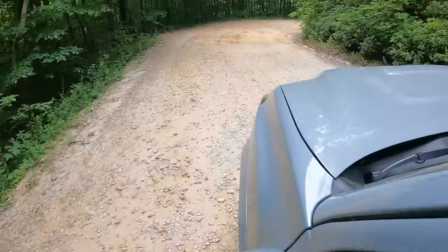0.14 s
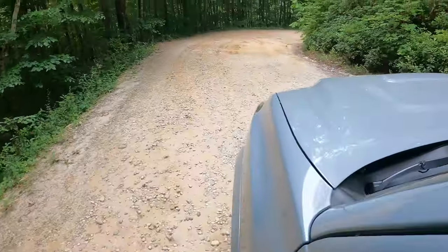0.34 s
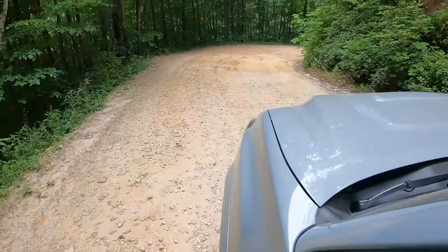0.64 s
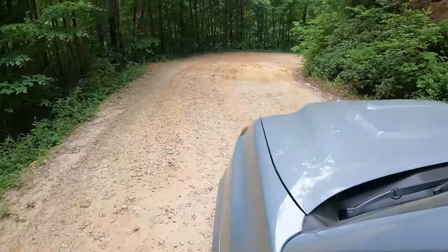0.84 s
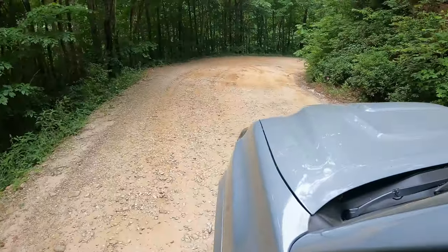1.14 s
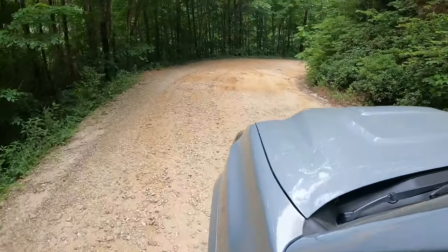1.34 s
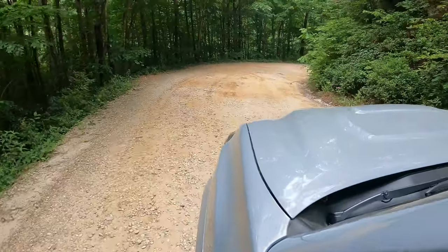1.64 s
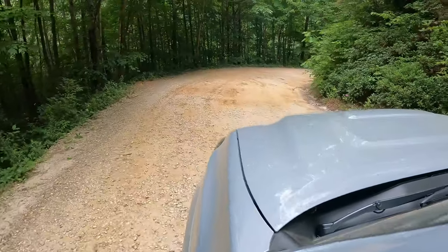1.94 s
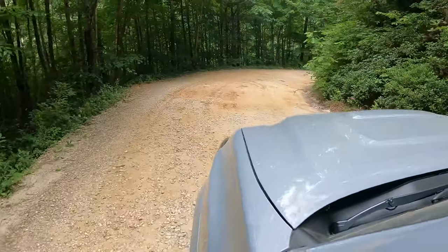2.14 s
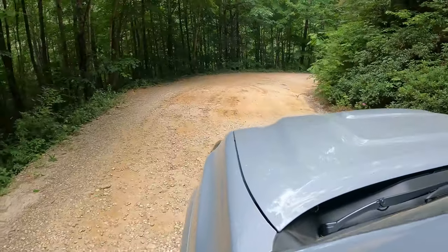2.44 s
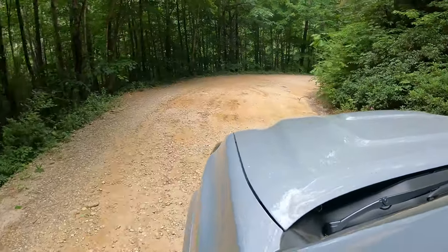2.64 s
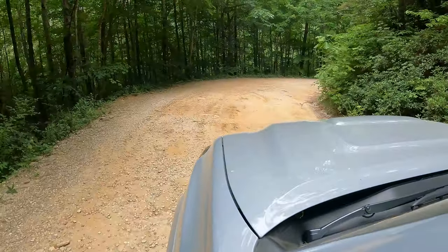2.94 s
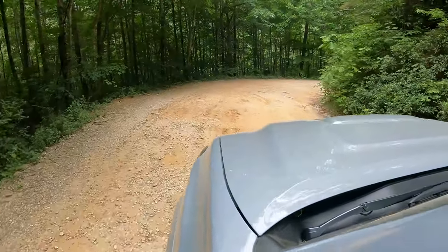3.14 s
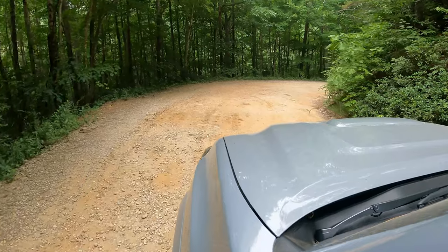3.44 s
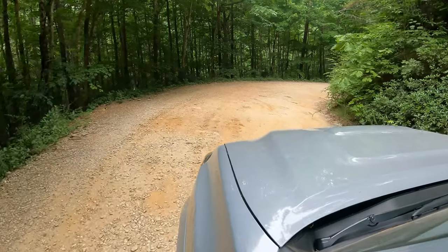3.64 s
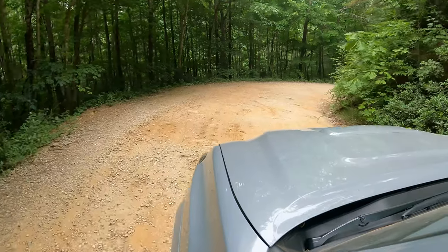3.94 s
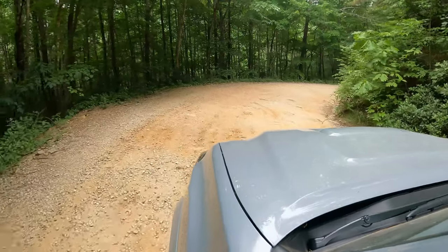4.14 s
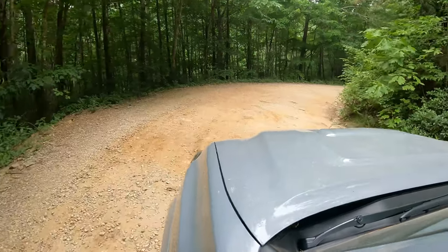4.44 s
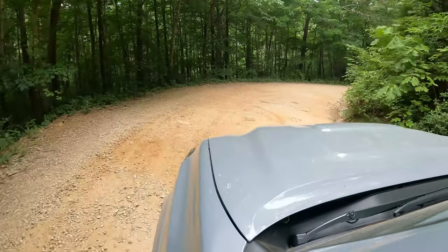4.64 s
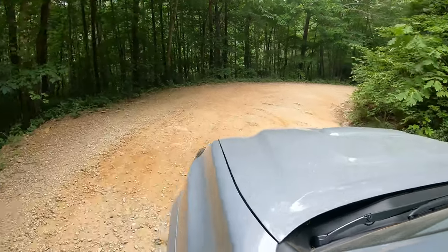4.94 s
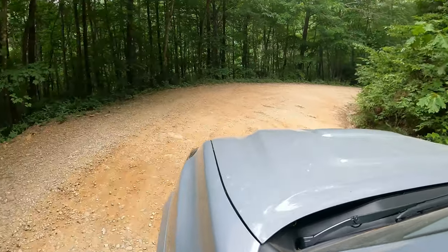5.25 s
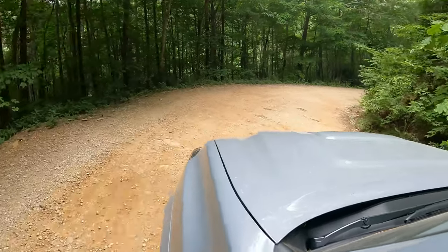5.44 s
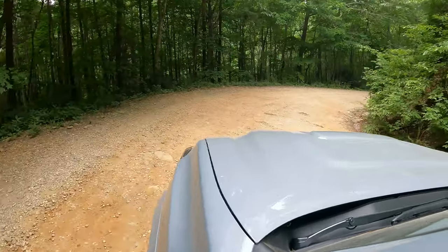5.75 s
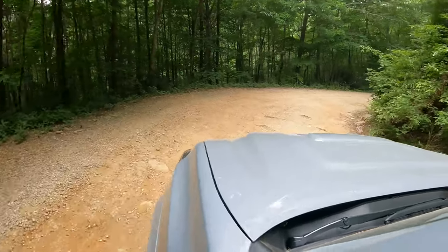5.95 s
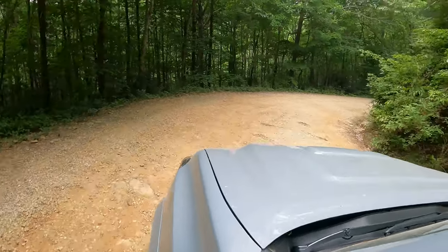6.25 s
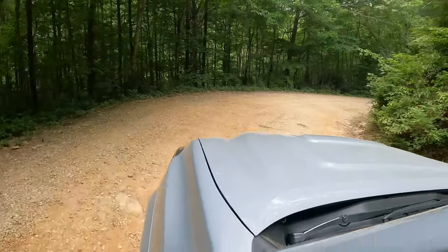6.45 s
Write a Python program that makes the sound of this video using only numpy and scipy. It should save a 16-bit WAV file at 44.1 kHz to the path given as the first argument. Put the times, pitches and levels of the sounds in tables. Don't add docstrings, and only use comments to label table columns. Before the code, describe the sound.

Slow tyres crush loose gravel with hollow, irregular pops and snaps, thickening into busy bursts, above a soft low engine drone and chassis rumble.

```python
import sys
import numpy as np
from scipy import signal
from scipy.io import wavfile

SR = 44100
rng = np.random.default_rng(int(sys.argv[2]) if len(sys.argv) > 2 else 0)


def to_wav(sig):
    pcm = np.clip(np.atleast_2d(sig), -1, 1) * 32767
    pcm = np.round(pcm).astype(np.int16)
    wavfile.write(sys.argv[1], SR, pcm.T)


def attenuation_scalar(level_db):
    decades = np.asarray(level_db, float) / 20
    return 10 ** decades


N = 291501


def evened(x):
    return x / np.sqrt(np.mean(x ** 2) + 1e-20)


def curve(rows, order=1):
    rows = np.array(rows, float)
    return np.interp(np.arange(N) / SR, rows[:, 0], rows[:, order])


def colour(x, points, size=8192):
    f, db = np.transpose(points)
    hz = abs(np.fft.fftfreq(size, 1 / SR))
    log_gain = np.log(attenuation_scalar(np.interp(np.log(hz + 1), np.log(f + 1), db)))
    response = np.exp(np.conj(signal.hilbert(log_gain)))
    taps = np.fft.ifft(response).real[:size // 2] * np.hanning(size)[size // 2:]
    return signal.oaconvolve(np.atleast_2d(x), taps[None], axes=1)[:, :x.shape[-1]]


def drift(hz):
    low = signal.butter(2, hz, fs=SR, output="sos")
    return evened(signal.sosfilt(low, rng.standard_normal(N)))


def add(mix, start_s, sound, pan_db):
    part = mix[:, round(start_s * SR):][:, :len(sound)]
    difference = np.tanh(np.clip(pan_db, -1, 7) * np.log(10) / 40)
    part += np.outer([1, difference], sound[:part.shape[1]])


def lean(snap_s):
    # snap in seconds, lean in dB.
    thrown = [
        (2.647, 7),
        (3.183, 2),
        (4.8905, 3),
        (4.9317, 3.5),
        (5.2586, 5),
        (5.6954, 3),
        (6.195, 3),
        (6.287, 0),
        (6.429, 1),
    ]
    return next((db for at_s, db in thrown if abs(at_s - snap_s) < .005), 1)


def snaps(rows, ring_t60_s=0.06, pitched=0.62):
    # frequency in Hz, level in dB per Hz.
    wall_ring = [(100, -47), (250, 8), (380, 6.5), (600, -4.5), (950, -1), (1300, -5.5), (1700, -8),
                 (4000, -69), (12000, -100)]
    lead_s, rise_s, wall_top_hz = .016, 0.0021, 1400
    out, t = np.zeros((2, N)), np.arange(4400) / SR - lead_s
    rings = evened(colour(rng.standard_normal((len(rows), len(t))), wall_ring))
    phases = rng.uniform(-1.98, 1.32, len(rows))
    for (snap_s, db, hz, cycles), ring, phase in zip(rows, rings, phases):
        snap = np.exp(-.5 * (t * hz / cycles) ** 2) * np.cos(2 * np.pi * hz * t + phase)
        tuned = evened(signal.lfilter(*signal.iirpeak(hz, 2.5, SR), ring))
        ring = (1 - pitched) * ring + pitched * tuned
        ring_db = min(-11.5 - 0.25 * (db + 24.5), -9)
        rise = np.sin(np.pi / 2 * np.clip(t / rise_s, 0, 1)) ** 2
        fade = attenuation_scalar(ring_db + 3.5 - 60 * t / ring_t60_s) * rise
        add(out, snap_s - lead_s, attenuation_scalar(db) * (snap + fade * ring), lean(snap_s))
    out = attenuation_scalar(-0.22) * signal.sosfiltfilt(signal.butter(3, wall_top_hz, fs=SR, output="sos"), out)
    return signal.sosfilt(signal.butter(2, 90, "high", fs=SR, output="sos"), out)


def stones():
    # snap in seconds, peak in dB, pitch in Hz, length in cycles.
    squeezed = [(0.2556, -14, 560, 0.71), (0.4033, -21.5, 380, 0.31), (0.4081, -29, 387, 0.16),
                (0.8707, -9.5, 350, 0.25), (1.3232, -18.5, 615, 0.31), (1.5728, -8.5, 677, 0.38),
                (1.9681, -22, 660, 0.64), (2.3025, -23, 396, 0.39), (2.3331, -22.5, 596, 0.54),
                (2.6469, -25.5, 263, 1), (2.7477, -22, 386, 0.68), (3.4737, -22, 269, 0.36),
                (3.4951, -14, 342, 0.16), (3.5193, -5, 410, 0.36), (3.5387, -15.5, 342, 0.26),
                (3.5579, -20.5, 435, 0.36), (3.7764, -18, 333, 0.66), (3.7841, -17, 342, 0.15),
                (3.8018, -14, 254, 0.36), (3.8165, -2, 433, 0.16), (4.0731, -25.5, 494, 1),
                (4.1385, -19.5, 338, 0.4), (4.1534, -26, 428, 0.44), (4.1592, -26, 486, 0.53),
                (4.1962, -6.5, 376, 0.33), (4.2061, -3.5, 574, 0.23), (4.245, -17, 686, 0.37),
                (4.8905, -19, 785, 0.34), (4.9317, -15.5, 525, 0.48), (5.1757, -25, 302, 0.37),
                (5.2586, -5, 560, 0.17), (5.3496, -17, 440, 0.37), (5.3879, -22, 347, 0.88),
                (5.4102, -10, 765, 0.26), (5.4502, -22, 432, 0.38), (5.5523, -9.5, 480, 0.47),
                (5.5563, -22, 497, 0.88), (5.5953, -24, 386, 0.52), (5.6205, -20, 346, 0.18),
                (5.6954, -15.5, 520, 0.36), (5.7406, -26, 312, 0.81), (5.922, -25, 390, 0.59),
                (5.9367, -14.5, 376, 0.47), (5.9433, -16.5, 333, 0.47), (6.1439, -25, 382, 0.43),
                (6.1954, -26, 504, 0.35), (6.2868, -20.5, 310, 0.75), (6.2941, -21.5, 300, 0.6)]
    # snap in seconds, peak in dB, pitch in
    # Hz.
    pebbles = [(0.0913, -31, 304), (0.114, -23, 778), (0.3183, -26, 547), (0.8539, -20, 670),
               (0.887, -44, 304), (1.4824, -26.5, 384), (1.5941, -24, 540), (2.4131, -24.5, 388),
               (2.583, -25.5, 334), (2.612, -30, 384), (2.732, -39, 304), (2.9137, -36, 302),
               (3.058, -30, 270), (3.162, -21.5, 435), (3.3063, -31, 304), (3.3899, -24, 298),
               (3.3983, -26, 304), (3.6904, -33, 270), (3.762, -26, 304), (3.7884, -26, 690),
               (3.8652, -24, 432), (3.9931, -28, 486), (4.06, -37, 270), (4.102, -39, 380),
               (4.122, -20.5, 270), (4.149, -18, 875), (4.166, -21, 432), (4.1772, -23.5, 875),
               (4.1884, -21, 342), (4.228, -18, 342), (4.3169, -30, 432), (4.581, -25.5, 384),
               (5.16, -24, 490), (5.204, -21, 984), (5.213, -27, 434), (5.2434, -20.5, 615),
               (5.2773, -24, 547), (5.298, -26, 432), (5.3634, -25, 875), (5.368, -35, 432),
               (5.4031, -13, 1090), (5.4633, -41, 342), (5.504, -37, 270), (5.6127, -26, 304),
               (5.627, -31, 384), (5.6443, -29, 486), (5.6559, -25, 486), (5.6764, -30, 432),
               (5.7172, -22, 490), (5.783, -27, 340), (5.9588, -23, 346), (5.983, -35, 270),
               (6.0574, -25, 346), (6.0646, -26.5, 342), (6.1348, -21.5, 272), (6.1516, -23, 300),
               (6.2021, -20, 432), (6.4292, -19.5, 880), (6.4347, -32, 432), (6.5829, -22.5, 890),
               (0.074, -23, 691), (0.0809, -28, 434), (0.109, -31, 304), (0.1497, -24, 615),
                    (0.2274, -30, 270), (0.2434, -26, 432), (0.278, -27, 486), (0.2855, -37, 432),
                    (0.3104, -28, 342), (0.382, -28, 270), (0.4129, -29, 550), (0.4438, -28, 270),
                    (0.8913, -34, 432), (0.9124, -30, 547), (1.0448, -35, 342), (1.08, -32.4, 270),
                    (1.192, -29, 240), (1.692, -29, 432), (1.7449, -33, 384), (1.8528, -24, 240),
                    (2.122, -36, 304), (2.3455, -31.2, 432), (2.7558, -38, 342), (2.8172, -39, 427),
                    (2.8635, -27, 269), (2.9965, -25.5, 298), (3.0176, -32, 384), (3.184, -22.5, 890),
                    (3.287, -28, 270), (3.3136, -33, 384), (3.481, -40, 304), (3.5636, -32, 547),
                    (3.569, -33, 432), (3.624, -36, 270), (3.642, -24, 240), (3.686, -28, 384),
                    (3.7133, -37, 432), (3.8599, -21, 342), (3.875, -24.5, 547), (3.895, -41, 272),
                    (3.9065, -29, 432), (3.9227, -26, 434), (4.067, -32, 547), (4.265, -28, 432),
                    (4.2928, -25, 615), (4.3247, -33, 691), (5.1382, -26, 304), (5.1672, -22, 384),
                    (5.221, -26, 304), (5.3064, -26, 615), (5.4894, -36, 384), (5.4965, -38, 432),
                    (5.5786, -20.5, 615), (5.6334, -24, 547), (5.6404, -32, 342), (5.6708, -35, 342),
                    (5.8524, -41, 342), (5.885, -30, 240), (6.3161, -25.5, 615), (6.5983, -36, 270)]
    # snap in seconds, peak in dB, pitch in Hz.
    cracks = [(0.085, -32, 1292), (0.2549, -18.5, 970), (0.8685, -37, 796), (1.966, -36, 800),
              (2.3013, -27, 850), (2.332, -25.5, 1030), (2.5802, -29, 938), (2.7464, -28.5, 866),
              (3.1242, -29.5, 938), (3.1926, -25, 1120), (3.547, -33, 1400), (3.775, -22, 800),
              (3.822, -18, 1016), (3.8338, -21, 1000), (3.8451, -29, 1016), (3.992, -29.7, 1016),
              (4.059, -25, 1020), (4.1365, -28, 866), (4.1646, -26, 1193), (4.1848, -29, 938),
              (4.1936, -12, 1020), (4.2055, -14, 870), (4.2337, -23, 938), (4.2742, -26.5, 1101),
              (4.9327, -21, 1016), (5.1583, -27, 1016), (5.1652, -24.5, 1100), (5.3468, -23, 938),
              (5.3858, -21, 930), (5.4333, -29, 1101), (5.4486, -20, 1070), (5.5525, -10.5, 980),
              (5.5883, -24, 938), (5.5935, -26, 1101), (5.6177, -27, 938), (5.6446, -27, 1101),
              (5.7188, -27, 866), (5.7354, -24, 1210), (5.9183, -26, 1101), (5.9344, -24, 1090),
              (5.9416, -18.5, 905), (5.957, -32, 1193), (5.995, -24, 1200), (6.194, -26.7, 1020),
              (6.201, -28, 1101), (6.445, -25, 1292)]
    pebble_cycles, crack_cycles = 0.29, 0.58
    rows = squeezed + [(*row, pebble_cycles) for row in pebbles]
    return snaps(rows + [(*row, crack_cycles) for row in cracks])


def faint_stones():
    # snap in seconds, peak in dB, pitch in Hz.
    faint = [(1.156, -36, 580), (1.277, -32, 600), (1.518, -33, 453), (1.649, -27, 553), (1.785, -42, 810),
             (.4445, -27, 950), (.4035, -22, 430), (.098, -32, 1100), (.113, -33, 1250), (3.43, -38, 746),
             (3.523, -26, 775), (5.693, -35, 750), (5.848, -31, 900), (2.223, -32, 780), (2.253, -32, 520),
             (2.488, -41, 600), (4.389, -42, 745), (4.5275, -31.5, 1010), (4.548, -29, 1050),
             (4.726, -29, 1110), (4.758, -31, 950), (4.779, -29, 790), (4.801, -29, 1300),
             (4.857, -33, 706)]
    return snaps([(*row, .5) for row in faint])


def grains(per_s, spread_db, wash_db, clump_db, clump_hz, left):
    size = attenuation_scalar(spread_db * np.minimum(rng.exponential(1, N), 4.2)) * (rng.random(N) < per_s / SR)
    sign, place, fine, other = rng.standard_normal((4, N))
    clicks = evened(size * np.sign(sign))
    pair = np.array([clicks + attenuation_scalar(wash_db) * fine, clicks * place + attenuation_scalar(wash_db) * other])
    pair[1] = left * pair[0] + np.sqrt(1 - np.clip(left, 0, 1) ** 2) * pair[1]
    return pair * attenuation_scalar(clump_db * drift(clump_hz))


def crunch():
    # time in seconds, tread load in dB.
    tread_load = [(0.0, -35), (.57, -40), (.85, -38.5), (2.74, -38), (3.13, -37.5), (4.12, -36.5),
                  (4.8, -40), (5.17, -39), (5.38, -32), (5.56, -36.5), (6.61, -39.5)]
    # frequency in Hz, level in dB per Hz.
    tyre = [(60, -25.5), (150, 2), (250, -3.5), (400, -6), (600, -7.5), (780, -12), (1050, -12),
            (1400, -25), (2000, -27), (3500, -39), (9000, -70)]
    bed = colour(grains(520, 2.5, -1.5, 1.8, 22, 0.56), tyre)
    return attenuation_scalar(curve(tread_load) - 0.43) * evened(bed)


def grit():
    # time in seconds, level in dB.
    spray = [(0.0, -60.5), (1.3, -61), (2.9, -62.5), (3.9, -60.5), (4.25, -59), (4.6, -60.5), (5.0, -57.5),
             (5.8, -56), (6.61, -56)]
    # frequency in Hz, level in dB per Hz.
    grit_spectrum = [(500, -43.5), (1300, 13), (2000, 2), (3200, -3.5), (5000, -9.5), (8000, -20.5),
                     (10000, -25.5), (11300, -34), (12300, -31.5), (14200, -46.5)]
    bed = colour(grains(4000, 1.4, 8.4, 1.0, 36, .2), grit_spectrum)
    band = signal.sosfilt(signal.butter(4, [2500, 9000], "band", fs=SR, output="sos"), bed[0])
    top = signal.sosfiltfilt(signal.butter(2, 5500, "high", fs=SR, output="sos"), bed)
    top_db = curve([(2.6, -4.5), (3, 0.5)])
    bed = bed + (attenuation_scalar(top_db) - 1) * top
    return attenuation_scalar(curve(spray)) * bed / band.std()


def skids(edge_s=0.0071):
    # start in seconds, length in seconds, level in dB.
    slips = [(0, 0.15, -50), (0.246, 0.035, -52), (3.177, 0.031, -47.5), (3.54, 0.028, -47),
             (3.785, 0.05, -53), (4.14, 0.037, -44.5), (4.183, 0.03, -48), (5.341, .12, -54),
             (5.543, 0.018, -41.5), (5.914, 0.047, -57), (6.569, 0.015, -42.5)]
    # frequency in Hz, level in dB per Hz.
    skid_spectrum = [(400, -24), (900, -4.5), (1500, 4), (2300, -4.5), (3500, -25), (7000, -41),
                     (12000, -79)]
    t, gate = np.arange(N) / SR, np.zeros(N)
    for start_s, length_s, db in slips:
        rise = np.clip((t - start_s) / edge_s, 0, 1)
        thinning = np.clip(1.5 - 0.93 * (t - start_s) / (length_s + edge_s), 0, 1)
        gate += attenuation_scalar(db) * rise * thinning
    rough = evened(colour(grains(1300, 3.0, -11, 0.86, 60, .4), skid_spectrum))
    return gate * rough * [[1], [.3]]


def ticks(rows, t60_s=.015):
    # frequency in Hz, level in dB per Hz.
    chip_spectrum = [(300, -20), (900, 0), (4000, -3), (8000, -13), (14000, -26)]
    out, t = np.zeros((2, N)), np.arange(1500) / SR
    scrapes = rng.standard_normal((len(rows), len(t))) * attenuation_scalar(-60 * t / t60_s)
    hits = colour(scrapes + 7.3 * (t == 0), chip_spectrum)
    for (hit_s, db, top_hz), hit in zip(rows, hits):
        hit = signal.lfilter(*signal.butter(4, top_hz, fs=SR), hit)
        add(out, hit_s - .0003, attenuation_scalar(db + 7.0) * hit / abs(hit).max(), 2.5)
    return out


def chips():
    # hit in seconds, peak in dB, hardness as top frequency in Hz.
    struck = [(0.026, -47, 2300), (0.074, -46, 2200), (.115, -42, 2190), (0.255, -40.5, 2960),
              (0.7855, -46, 14000), (.7868, -43.5, 9000), (.79, -55, 13000), (.7965, -53, 13930),
              (0.828, -38, 2600), (.870, -51, 8950), (1.0763, -50, 5000), (2.2032, -53, 6000),
              (2.8655, -52, 12050), (2.922, -55, 12000), (3.183, -47, 2983), (3.4917, -52, 9000),
              (3.548, -45, 2998), (3.7737, -42, 9500), (3.7895, -52, 4000), (3.8168, -47, 2500),
              (3.866, -58, 3980), (4.1478, -41, 4500), (4.1584, -43, 6000), (4.165, -43, 2500),
              (4.178, -47, 2500), (4.196, -44, 4000), (4.262, -48, 9000), (4.8886, -46, 5040),
              (4.931, -46, 2500), (5.257, -42, 4770), (5.346, -55, 2500), (5.363, -52, 2200),
              (5.386, -35, 2800), (5.401, -39, 2800), (5.449, -43, 2000), (5.55, -45, 2000),
              (5.8988, -60, 6000), (5.933, -40, 3500), (5.996, -48, 3000), (6.196, -51, 2010),
              (6.4279, -42, 9000), (6.5814, -42, 5000)]
    # hit in seconds, peak in dB, top frequency in Hz.
    more_chips = [
        (.7865, -44, 4500),
        (1.648, -47, 5000),
        (2.239, -54, 4000),
        (2.755, -54, 5000),
        (2.983, -60, 5000),
        (3.582, -48, 4500),
        (4.4435, -54, 5000),
        (5.2578, -39, 4000),
        (5.5325, -52, 5500),
        (5.594, -44, 5500),
    ]
    return ticks(struck) + ticks(more_chips)


def engine():
    # time in seconds, hum pitch in Hz.
    idle = [(0, 105.7), (.6, 106), (1.0, 107.8), (1.42, 108.4), (1.93, 106.8), (2.37, 105.5), (6.61, 105.6)]
    # time in seconds, hum level in dB.
    load = [(0.0, -40), (.6, -40), (1.0, -38.5), (1.9, -40.5), (2.15, -39), (2.5, -33.5), (2.8, -38.5),
            (3.3, -35.5), (4.1, -35.5), (4.8, -37), (5.8, -38.5), (6.2, -39), (6.61, -32.5)]
    # multiple of the hum pitch, level in dB relative to the hum.
    orders = [(1 / 6, -15), (1 / 3, -18), (2 / 3, -10), (4 / 3, -13.5)]
    wander_hz, waver_db = 0.91, 1.33
    turns = np.cumsum(curve(idle) + wander_hz * drift(2.06)) / SR
    hum = attenuation_scalar(waver_db * drift(3.0)) * np.sin(2 * np.pi * turns)
    for multiple, db in orders:
        phase = multiple * turns + 0.15 * drift(1.9)
        hum = hum + attenuation_scalar(db + 1.6 * drift(1.0)) * np.sin(2 * np.pi * phase)
    return np.sqrt(2) * attenuation_scalar(curve(load)) * hum * [[1], [.6]]


def rumble():
    # time in seconds, extra rumble in dB.
    jolts = [(.58, 1.5), (.85, 1.5), (1.2, 2), (1.43, 5), (1.77, 7.5), (1.88, 2.5), (2.69, 5), (3.09, 4.5),
             (3.28, 4.5), (3.52, 2), (3.74, 7), (3.92, 7), (4.04, 6.5), (4.19, 3.5), (4.43, 7), (4.51, 5.5),
             (4.75, 5.5), (4.92, 5), (5.97, 4.5), (6.07, 9.5), (6.2, 2), (6.35, 2), (6.5, 7.5)]
    # time in seconds, level in dB.
    bounce = [(0, -41), (.6, -32), (1.1, -43), (1.4, -31), (1.7, -37), (2.3, -29), (2.9, -33.5), (3.5, -28),
              (3.95, -42), (4.4, -18.5), (4.72, -46), (4.95, -23), (5.2, -38), (5.5, -31), (5.8, -27),
              (6.1, -33.5), (6.61, -34)]
    # frequency in Hz, level in dB per Hz.
    body_spectrum = [(6, -52.5), (12, -19.5), (17, 3.5), (24, 7.5), (33, 1.5), (48, 6.5), (58, -16.5),
                     (72, -0.5), (95, -12), (150, -12.5), (300, -43.5), (3000, -120)]
    jolt_s, bounce_hz, steady_s = 0.033, 15, 2.11
    t = np.arange(N) / SR
    level_db = -34 + 1.5 * np.minimum(t, steady_s)
    level_db = level_db + sum(db * np.exp(-.5 * ((t - at_s) / jolt_s) ** 2) for at_s, db in jolts)
    shake = np.pad(rng.standard_normal((2, N)), ((0, 0), (SR, 0)), "wrap")
    out = attenuation_scalar(level_db + 0.77) * evened(colour(shake, body_spectrum)[:, SR:])
    out[0] += np.sqrt(2) * attenuation_scalar(curve(bounce) - 5.5) * np.sin(2 * np.pi * bounce_hz * t + 2.64)
    return out


def scene():
    # frequency in Hz, level in dB.
    ports = [(60, -24.5), (200, -27.5), (400, -24.5), (800, -15.5), (1500, -13.5), (3000, -10), (8000, -6),
             (13000, -7.5)]
    both, apart = crunch() + grit() + engine() + rumble()
    knock, knock_apart = stones() + faint_stones()
    knock_apart = attenuation_scalar(4.5) * signal.lfilter(*signal.butter(1, 700, "high", fs=SR), knock_apart)
    mix = np.array([both + knock, colour(apart, ports)[0] + knock_apart])
    both, apart = mix + chips() + skids()
    return np.array([both + apart, both - apart])


def low_pass(x):
    return signal.sosfilt(signal.butter(12, 14250, fs=SR, output="sos"), x)


def record(dry):
    # time in seconds, port difference left in dB.
    bass_guard = [(0, 14), (.25, -2), (.3, -51), (2.58, -56), (2.63, 2), (3.0, -8.5), (6.61, 1.5)]
    # time in seconds, port difference left in dB.
    middle_guard = [(0, 0), (.3, -17), (1.1, -37), (1.7, -38), (2.2, -15), (3.1, -0.5), (6.61, 4)]
    # time in seconds, port difference left in dB.
    top_guard = [(0, -2), (.45, -10), (1.0, -15), (1.85, -18), (2.2, -5.5), (3.0, -1.5), (6.61, -1.5)]
    bass_hz, top_hz, hiss_hz = 330, 3500, 9500
    both, apart = dry.mean(0), (dry[0] - dry[1]) / 2
    bass = signal.sosfiltfilt(signal.butter(4, bass_hz, fs=SR, output="sos"), apart)
    top = signal.sosfiltfilt(signal.butter(4, top_hz, "high", fs=SR, output="sos"), apart)
    middle = apart - bass - top
    apart = bass * attenuation_scalar(curve(bass_guard)) + middle * attenuation_scalar(curve(middle_guard)) + top * attenuation_scalar(curve(top_guard))
    hiss = signal.sosfilt(signal.butter(4, hiss_hz, "high", fs=SR, output="sos"), rng.standard_normal(N))
    apart = apart + attenuation_scalar(-85.0) * hiss
    return low_pass(np.array([both + apart, both - apart]))


dry = scene()
out = record(dry)
to_wav(out)
```